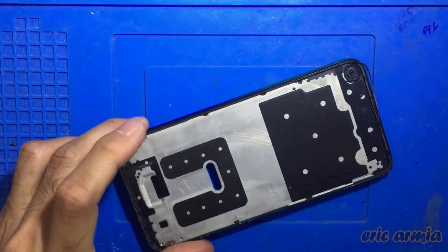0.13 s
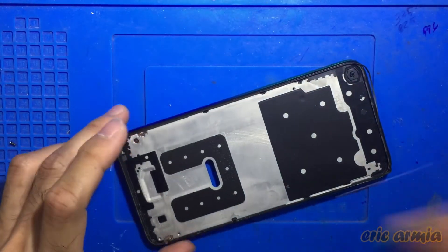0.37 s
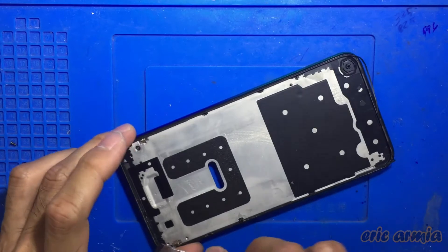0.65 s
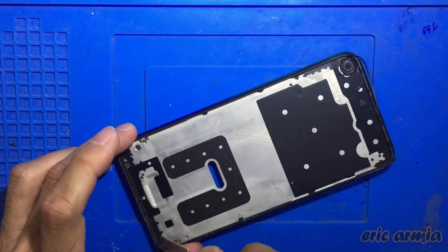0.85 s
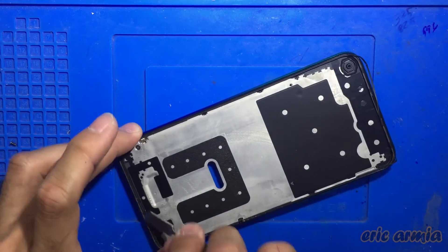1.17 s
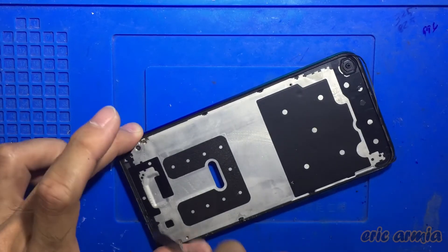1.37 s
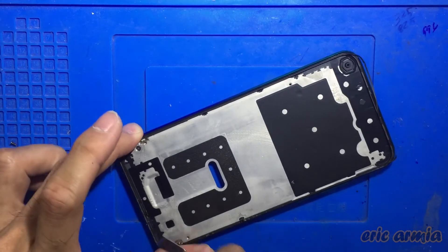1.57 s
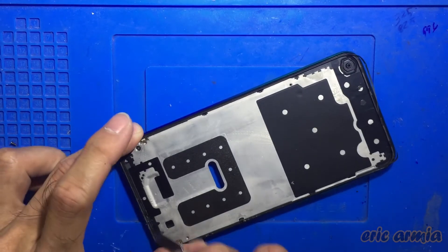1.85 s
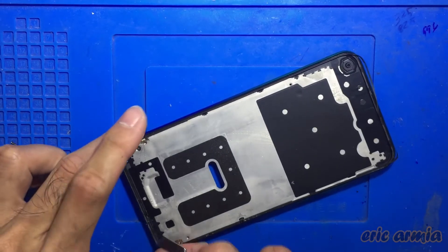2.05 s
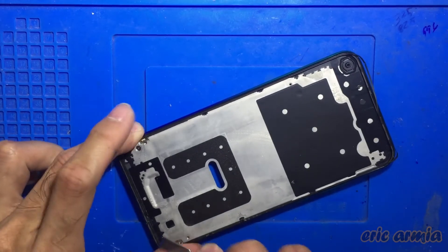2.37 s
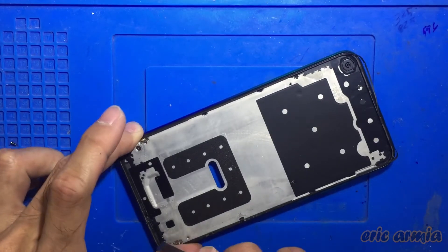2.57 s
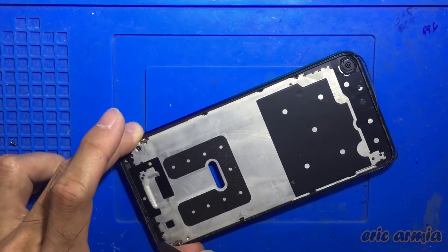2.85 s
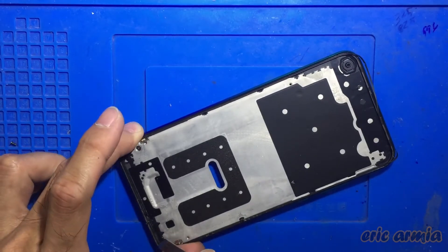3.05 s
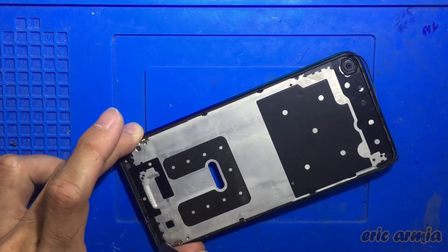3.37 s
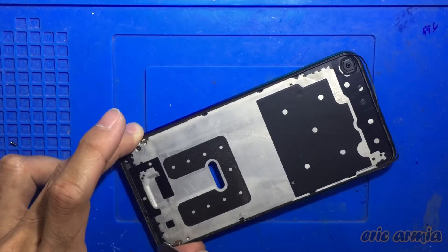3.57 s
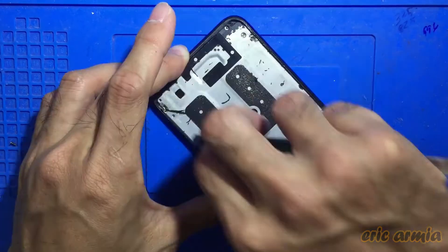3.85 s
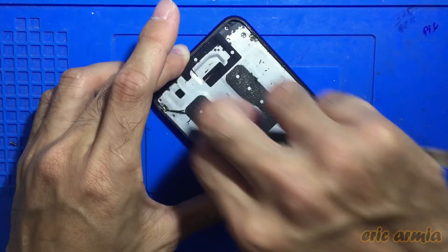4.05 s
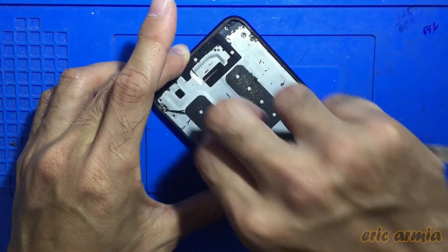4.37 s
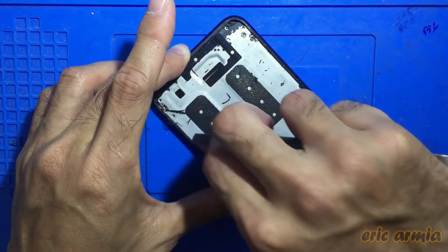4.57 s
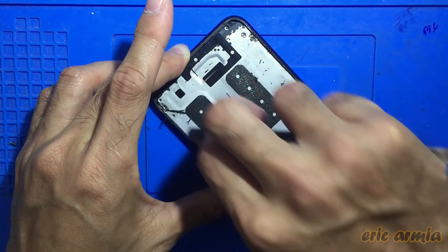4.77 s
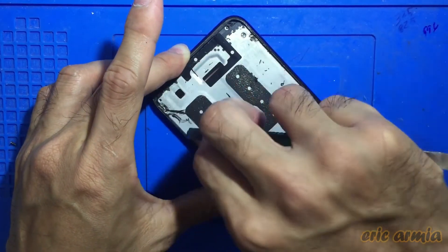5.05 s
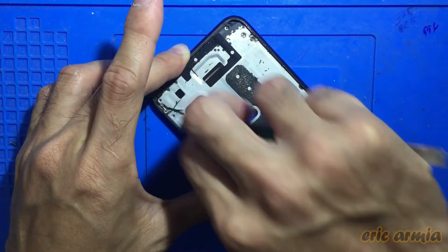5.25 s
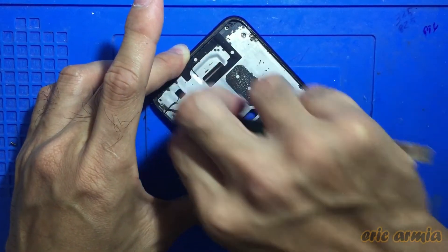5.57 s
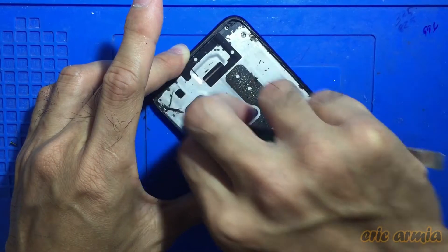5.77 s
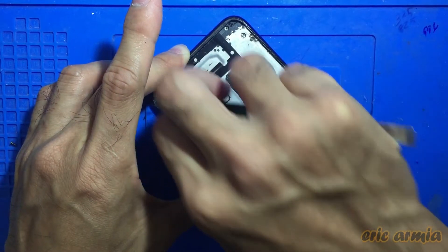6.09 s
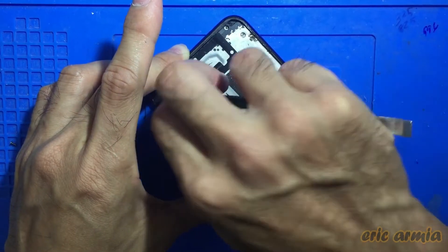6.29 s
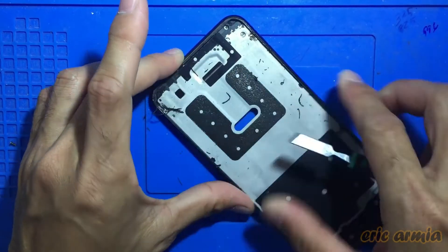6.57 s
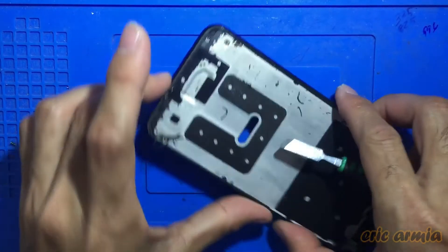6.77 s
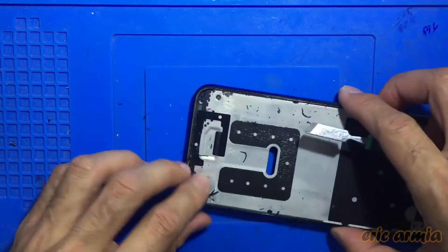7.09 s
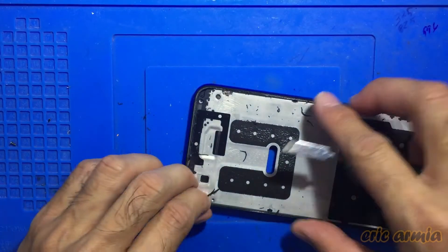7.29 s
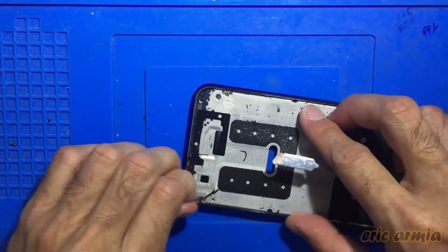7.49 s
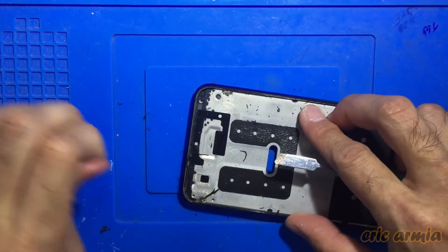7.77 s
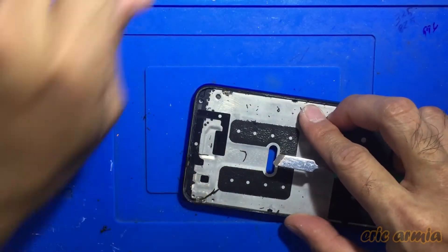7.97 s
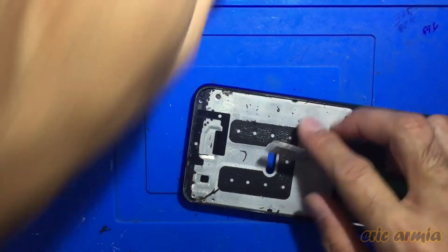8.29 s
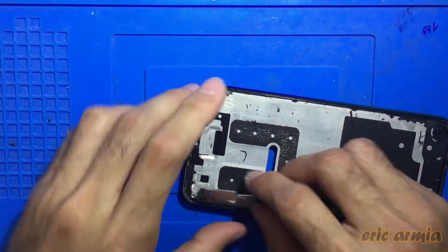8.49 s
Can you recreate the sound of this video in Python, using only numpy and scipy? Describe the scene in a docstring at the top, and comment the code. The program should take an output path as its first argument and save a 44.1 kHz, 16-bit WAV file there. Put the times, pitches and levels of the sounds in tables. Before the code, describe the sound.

A low bench-fan hum with soft dull noise runs throughout in a small, dry room, miked close. At 0 to 0.2 s a loose steel tool clatters and skids with a short bright ring; faint ticks follow at 0.4 s. From about 1.2 to 2.1 s a hand tool scrapes the rim of a metal phone frame, eight raspy strokes growing stronger. At 2.2 s it breaks free with a loud hard snap, by far the loudest event, and a rattle dying within a tenth of a second. Near silence, then at 3.3 to 3.75 s sharp picks and scratches, the first a solid knock. From 3.9 to 6.4 s the plate is scrubbed to and fro, about nine gritty metallic strokes a second, uneven, with small catches. A tick at 6.5 s, a soft thud at 6.7 s, a click with light scraping at 7.3 to 7.5 s, and a last click at 7.8 s; then only hum.

```python
"""A loose steel tool clatters first, as bursts of contact noise and free ringing tones.
Then a hand tool picks along the rim of a metal phone frame on a rubber mat: grains of noise ring the frame.
It breaks free with a loud snap and a short rattle, made of brief blows, then picks at the rim again.
Next it scrubs the flat plate to and fro, about nine strokes a second, and two clicks follow at the end.
Bench equipment hums throughout: steady tones over filtered noise. A small room answers the work."""
import sys
import numpy as np
from scipy import signal
from scipy.fft import rfft, irfft, next_fast_len
from scipy.io import wavfile
from scipy.ndimage import uniform_filter1d

SR = 44100
rng = np.random.default_rng(int(sys.argv[2]) if len(sys.argv) > 2 else 0)


def inscribe(sig):
    """Save sig as 16-bit PCM at rate SR to the path in sys.argv[1].

    A 1-D sig is mono; a 2-D sig holds one channel per row.
    Samples are clipped to [-1, 1] before scaling.
    """
    pcm = np.round(np.clip(np.atleast_2d(sig).T, -1, 1) * 32767)
    wavfile.write(sys.argv[1], SR, pcm.astype(np.int16))


N = 380583  # length in samples


def gain_of(db):
    """Turns decibels into a gain."""
    return 10 ** (np.asarray(db) / 20)


def evened(x):
    """Scales a sound to an rms of 1."""
    return x / np.sqrt(np.mean(x ** 2) + 1e-20)


def read(points, hz):
    """Joins (Hz, value) points by straight lines over log frequency."""
    f, value = np.transpose(points)
    return np.interp(np.log(hz + 1), np.log(f), value)


def add(mix, s, sound):
    """Mixes a sound in at time s, cutting off what falls outside."""
    start = round(s * SR)
    sound = sound[max(-start, 0):]
    part = mix[max(start, 0):][:len(sound)]
    part += sound[:len(part)]


def drift(per_s, size):
    """Joins random values, per_s of them each second, by straight lines."""
    at = np.arange(size) * per_s / SR
    return np.interp(at, np.arange(size // 8), rng.standard_normal(size // 8))


# Strokes to and fro. Each row: middle in seconds, level in dB before the layer's own level,
# length at half power in seconds, brightness in dB, extra low ring in dB,
# lean without unit (plus swells slowly and stops short, minus the reverse), favoured band in Hz.
STROKES = [(1.293, -43, 0.039, -2, -1, -0.0006, 9500), (1.412, -43, 0.06, -3, -11, 0.13, 8360),
           (1.537, -41, 0.042, -14, -4, 0.2, 2800), (1.652, -36.5, 0.033, 2.5, -13, 0.27, 3980),
           (1.768, -35.5, 0.044, -10, 4, 0.07, 7540), (1.881, -34, 0.038, -4, -11, 0.25, 4100),
           (2.003, -34, 0.036, -3.5, 8, -0.072, 6700), (2.113, -32, 0.032, -3, -2.5, 0.064, 8400),
           (2.348, -40.5, 0.032, 3, -5, 0, 6800), (3.921, -37.5, 0.029, 1.5, -2.5, 0.078, 7600),
           (4.053, -36.5, 0.044, -3, 6, 0.41, 7830), (4.154, -40.5, 0.032, -1, 0, 0.18, 7800),
           (4.297, -36.5, 0.044, -4.5, 5, 0.32, 7800), (4.397, -38, 0.038, -2.5, 1.5, 0.09, 7900),
           (4.54, -37.5, 0.045, -1.5, 7, 0.37, 7400), (4.632, -43, 0.041, -3, -1, -0.096, 7350),
           (4.773, -42, 0.047, -6, 7, 0.45, 5930), (4.866, -46.5, .05, -6, 6, -0.18, 8500),
           (5.013, -40, 0.058, -10, 4.5, 0.32, 5800), (5.114, -42, 0.044, -3, 4.5, 0.046, 7360),
           (5.24, -42, 0.048, -7, 3, 0.27, 5940), (5.346, -39, 0.036, -3.5, 3.5, -0.06, 7100),
           (5.481, -38, .047, -7.5, 3.5, 0.32, 9030), (5.575, -41, .046, -5.5, 1.5, -0.17, 8100),
           (5.723, -37, 0.041, -6.5, 4.5, 0.51, 2310), (5.812, -41, 0.044, -5, 0, -0.26, 3800),
           (5.947, -38, 0.041, -12, 3.5, 0.33, 8200), (6.041, -42.5, 0.049, -8, 2.5, 0.017, 8800),
           (6.167, -42.5, 0.051, -10.5, 4.5, 0.47, 7900), (6.259, -40, 0.048, -10, -0.5, -0.25, 3400),
           (6.389, -40, 0.053, -8.5, 6, 0.42, 9400)]
# Single rubs outside the rhythm. Each row: middle in seconds, level in dB before the layer's own level,
# length at half power in seconds, brightness in dB, favoured band in Hz.
RUBS = [(0.399, -46.5, 0.021, 14.5, 2000), (0.619, -59, 0.022, 14, 3030), (1.23, -38.5, 0.057, -5, 5750),
        (1.369, -48, .02, -5, 3550), (2.233, -24, 0.018, 7, 2700), (2.3, -41, .05, 7, 6400),
        (2.777, -50.5, 0.022, -4.5, 1890), (2.906, -51, 0.039, -16, 1900), (3.315, -36.5, 0.01, -9.5, 1844),
        (3.354, -34.5, 0.044, 2, 2600), (3.464, -41, 0.044, 2.5, 3600), (3.556, -36, 0.032, 2, 2400),
        (3.614, -48, 0.015, -6, 1900), (3.707, -41, 0.015, -11, 1970), (3.749, -40.5, 0.0088, 0, 1911),
        (6.509, -39, 0.016, -12.5, 1960), (6.724, -52.5, 0.039, 0, 2650), (7.385, -43, 0.015, -4, 2500),
        (7.41, -40.5, 0.039, 7.5, 3700), (7.424, -40.5, 0.019, -2, 2400), (7.455, -41, 0.012, -8, 3500),
        (7.508, -51, 0.017, 0, 3500), (7.526, -54, 0.013, -4.5, 2600)]


def all_strokes():
    """Lists all rubbing as stroke rows: a single rub is even and has no extra low ring."""
    return even_strokes(RUBS) + STROKES


def even_strokes(rubs):
    """Gives rubs the form of stroke rows, with no low ring and no lean."""
    return [(s, db, length, bright_db, 0, 0, hz) for s, db, length, bright_db, hz in rubs]


PLATE_FROM, PLATE_TO = 3.83, 7.0  # seconds between which the plate is worked


def on_plate(rows):
    """Picks the rows that fall in the time on the plate."""
    return [row for row in rows if PLATE_FROM <= row[0] < PLATE_TO]


def on_rim(rows):
    """Picks the rows outside the time on the plate."""
    return [row for row in rows if not PLATE_FROM <= row[0] < PLATE_TO]


# Resonances of the frame. Each row: pitch in Hz, width at half the lift in Hz,
# lift in dB when worked at the rim, lift in dB when worked on the plate, lift in dB when knocked.
FRAME_MODES = [(612, 27, 8, 6, 0), (843, 93, 16, 17, 13), (1020, 120, 8.5, 10.5, 6.5),
               (1325, 150, 8.5, 5.5, 6), (1524, 330, 4, 12, 1.5), (1791, 178, 17, 11, 9),
               (1886, 207, 14.5, 15, 5.5), (2046, 170, 18, 14, 4), (2424, 260, 4.5, 6.5, 5),
               (2550, 180, 4.5, 3, 5.5), (3150, 140, 7.5, 3, 8), (3351, 180, 4, 15, 4.5),
               (3603, 310, 8.5, 9.5, 2.5), (4180, 620, 3.5, 4.5, 4), (4490, 140, 1.5, 13, 6),
               (5260, 210, 2, 7, 2.5), (5750, 260, 8.5, -0.5, 6), (6300, 350, 7, 5, 10),
               (6700, 710, 8, 7.5, 2), (7677, 610, 5, -3.5, 4.5), (8284, 590, 9, 1, 2.5),
               (8793, 510, 8.5, 6, 8.5), (9530, 630, 7, 8, 3), (11200, 180, 0, 15, -1),
               (11700, 870, 6, 3, 0.5), (12300, 410, 3, 9, 1.5), (13700, 330, 2.5, 12, 2),
               (14910, 610, 7, 7, 2.5)]
# Broad colour under the resonances, for each kind of contact. Each row: pitch in Hz, relative level in dB.
RIM_COLOUR = [(40, -13), (110, -1), (220, -9.5), (300, -15.5), (720, -18), (1650, -15), (2250, -10.5),
              (2900, -16.5), (4800, -20.5), (8000, -30.5), (12000, -32), (15500, -31)]
PLATE_COLOUR = [(35, 5), (55, 17), (110, 8.5), (210, 5), (300, -8), (720, -13.5), (1650, -18.5),
                (2250, -0.5), (2900, -16), (4800, -23), (8000, -29.5), (12000, -33), (15500, -35)]
KNOCK_COLOUR = [(60, -22), (330, -18.5), (480, -19.5), (720, -19), (1650, -7.5), (2250, -1), (2900, -7),
                (4800, -11), (8000, -15), (12000, -13.5), (15500, -19)]


def frame_contacts():
    """One frame rings differently at the rim, on the plate and when knocked: (colour, modes) for each."""
    hz, width, *lifts = np.transpose(FRAME_MODES)
    colours = [RIM_COLOUR, PLATE_COLOUR, KNOCK_COLOUR]
    return [(colour, list(zip(hz, width, lift))) for colour, lift in zip(colours, lifts)]


def scrubbing(rows, contact, grains_per_s, spread_db, judder_db, smooth, level_db):
    """Each stroke swells and fades; tiny stick-slip grains bunch into a judder, as the ring changes."""
    out, t = np.zeros(N), np.arange(-SR // 10, SR // 10) / SR
    colour, modes = contact
    for s, db, length, bright_db, weight_db, lean, favoured_hz in rows:
        travel = 2 * t / max(length, .008)
        steepness = 6 * (1 + np.clip(lean, -.7, .7) * np.sign(t))
        speed = signal.windows.tukey(len(t), .5) / np.sqrt(1 + abs(travel) ** steepness)
        strength_db = spread_db * np.minimum(rng.exponential(1, len(t)), 2)
        slips = (rng.random(len(t)) < grains_per_s / SR) * gain_of(strength_db)
        grain = evened(slips * rng.choice([-1, 1], len(t)))
        grain = grain + smooth * rng.standard_normal(len(t))
        # a fast judder, and a slower lurch of 2 dB
        judder = gain_of(judder_db * np.clip(drift(170, len(t)), -2, 2) + 2 * drift(60, len(t)))
        force = gain_of(db + level_db) * evened(grain * speed * judder) * np.sqrt(np.mean(speed ** 2))
        # the ring fades over from one spot to the next along the stroke
        for nearness in np.eye(2):
            share = np.interp(travel, [-1, 1], nearness)
            spot = at_spot(modes, [favoured_hz], wander_db=1.5)
            add(out, s + t[0], ring(share * force, body(colour, spot, bright_db, weight_db)))
    return out


SCRATCH_LOW_HZ, SCRATCH_HIGH_HZ = 2700, 6600  # pitch range of single scratches and rattle blows
SCRATCH_WIDTH = 0.14  # half width of a scratch's band, as a share of its pitch
SCRATCH_S, SCRATCH_REACH = .0022, 0.66  # fading time in s, and scatter to either side in stroke lengths
SCRATCH_RANGE_DB, SCRATCH_FALL_DB = 10, 8.5  # spread of strength, and loss at the top pitch


def scratch_pitch(height):
    """Turns a height from 0 to 1 into a pitch in Hz, in even musical steps."""
    return SCRATCH_LOW_HZ * (SCRATCH_HIGH_HZ / SCRATCH_LOW_HZ) ** height


def scratches(rows, level_db, count=18):
    """The tip crosses small burrs within each stroke: brief noise bursts, each with its own pitch."""
    out, t = np.zeros(N), np.arange(-SR // 100, SR // 50) / SR
    hz = np.fft.rfftfreq(len(t), 1 / SR)
    for s, db, length, bright_db, *_ in rows:
        for where, pitch, size in rng.random((count, 3)):
            centre = scratch_pitch(pitch)
            band = 1 / (1 + ((hz - centre) / (SCRATCH_WIDTH * centre)) ** 2)
            noise = evened(irfft(band * rfft(rng.standard_normal(len(t))), len(t)))
            burst = noise * np.exp(-abs(t) / SCRATCH_S)
            # a brighter stroke makes stronger scratches
            strength_db = db + level_db + bright_db - SCRATCH_RANGE_DB * size - SCRATCH_FALL_DB * pitch
            offset_s = (2 * where - 1) * SCRATCH_REACH * length
            add(out, s + offset_s + t[0], gain_of(strength_db) * burst)
    return out


# The tip catches hard on a ridge and slips off. Each row: time in seconds,
# level in dB before the layer's own level, brightness in dB, favoured band in Hz.
CATCHES = [(0.983, -48, -21, 3500), (1.226, -41.5, -5, 5900), (1.297, -39, 0, 6500),
           (1.314, -44, 10.5, 5700), (1.405, -34, 3, 8200), (1.483, -42.5, 6.5, 5700),
           (1.511, -35.5, -8, 4100), (1.536, -42, -16, 2800), (1.555, -41, -4.5, 5900),
           (1.62, -34.5, 8.5, 4200), (1.658, -27.5, 5.5, 8200), (1.7505, -29, -0.5, 7450),
           (1.863, -39.5, 7, 5770), (1.877, -38, -6, 4100), (1.921, -57.5, 10, 4060),
           (1.984, -33, -4, 5660), (1.994, -30, -6, 6650), (2.024, -39, -6, 6700), (2.202, -22, 3.5, 6700),
           (2.222, -30, 7, 4200), (2.236, -29.5, 17, 6800), (2.334, -34.5, -8, 2996),
           (2.995, -35.5, -12, 3500), (3.3295, -17, -8, 1402), (3.351, -25.5, 9.5, 8400),
           (3.368, -22.5, -6.5, 2516), (3.39, -40, 3, 2500), (3.4585, -22, 3.5, 8050),
           (3.541, -35.5, -10, 9300), (3.552, -35, -3, 2370), (3.7505, -29, -17, 4470),
           (3.89, -35, -12.5, 2400), (3.924, -27, 1, 5200), (4.076, -38, -16, 2340),
           (4.159, -26.5, -0.5, 3360), (4.297, -28, 2, 3380), (4.321, -33, 10, 7300),
           (4.402, -22.5, 4, 3330), (4.535, -28, 15.5, 7100), (4.544, -25, 13.5, 7240),
           (4.554, -32, 20.5, 7240), (4.613, -33, -8, 3400), (4.787, -35.5, -12.5, 5800),
           (4.848, -34, -4, 8500), (4.885, -40, -6, 3400), (5.017, -32, -21, 2410), (5.033, -27.5, 4, 9600),
           (5.0995, -23.5, -9.5, 2380), (5.354, -35.5, -10, 2400), (5.562, -25.5, -6, 3510),
           (5.738, -36.5, 1.5, 2330), (5.812, -32.5, -8, 3820), (6.03, -31, -16, 2400),
           (6.493, -43.5, -1, 3400), (6.507, -33, 10, 8900), (6.512, -45, 3, 3400)]


def catches(rim, plate):
    """The tip grips a ridge and slips off: short blows; weaker catches ring the resonances less."""
    out = blows(on_rim(CATCHES), rim, rise_s=0.0011, chatter_s=0.0014, level_db=-3.0,
                lag_s=0.00098, freedom_per_db=0.03)
    out += blows(on_plate(CATCHES), plate, rise_s=0.00095, chatter_s=0.0021, level_db=-6.5,
                 lag_s=0.000975, freedom_per_db=0.04)
    return out


# Hard knocks on the frame, with the snap and the end clicks. Each row: time in seconds,
# level in dB before the layer's own level, brightness in dB, favoured band in Hz.
KNOCKS = [(0.397, -51.5, 1, 4030), (0.408, -50.5, 6, 3760), (0.419, -57, 6, 3420), (2.245, -10, -2, 1300),
          (2.2595, -24, -3.5, 2915), (6.733, -54, -8.5, 6156), (7.332, -44.5, -3, 1900),
          (7.3348, -35.5, 8, 2450), (7.3375, -44.5, 6, 3480), (7.3415, -45, 6, 4500),
          (7.346, -40, 7.5, 3900), (7.8275, -38.5, 2, 3820), (7.832, -53.5, 1, 2100)]


def knocks(contact):
    """Hard contacts start abruptly and ring the whole frame."""
    return blows(KNOCKS, contact, rise_s=0.0002, chatter_s=0.0028, level_db=-0.5, lag_s=0.00042)


RATTLE_FROM, RATTLE_S = 2.252, .11  # start and length in seconds
RATTLE_DB, RATTLE_FADE_DB_PER_S = -30, 261  # first level before the layer's own level, and its fall
RATTLE_RANGE_DB, RATTLE_BRIGHT_DB = 8.5, -4.5  # spread of strength, and brightness


def rattle(contact, count=24):
    """After the snap the frame rattles ever more weakly: a run of unevenly spaced blows."""
    when, weakness, height = rng.random((count, 3)).T
    after_s = (np.arange(count) + when) / count * RATTLE_S
    level_db = RATTLE_DB - RATTLE_FADE_DB_PER_S * after_s - RATTLE_RANGE_DB * weakness
    rows = [(RATTLE_FROM + s, db, RATTLE_BRIGHT_DB, hz)
            for s, db, hz in zip(after_s, level_db, scratch_pitch(height))]
    return blows(rows, contact, rise_s=0.00066, chatter_s=0.0014, level_db=-2, wander_db=2.5)


FULL_RING_DB = -38  # row level from which a catch rings the resonances in full


def blows(rows, contact, rise_s, chatter_s, level_db, lag_s=.001, wander_db=0.6, freedom_per_db=0):
    """Each blow is a burst of chatter at the contact: it builds up fast and dies within milliseconds."""
    out, t = np.zeros(N), np.arange(-SR // 100, SR // 40) / SR
    too_brief_for_bass = signal.butter(2, 190, "high", fs=SR, output="sos")
    colour, modes = contact
    for s, db, bright_db, *favoured_hz in rows:
        envelope = np.exp(-np.maximum(t / chatter_s, -t / rise_s))
        force = rng.choice([-1, 1], len(t)) * envelope
        force = signal.sosfilt(too_brief_for_bass, whitened(force))
        force *= np.sqrt(SR / 100 / np.sum(force ** 2))  # the energy of 10 ms at rms 1
        freedom = np.clip(1 + freedom_per_db * (db - FULL_RING_DB), 0, 1)
        free_modes = [(hz, width, lift * freedom) for hz, width, lift in modes]
        spot = at_spot(free_modes, favoured_hz, wander_db)
        add(out, s + lag_s + t[0], ring(gain_of(db + level_db) * force, body(colour, spot, bright_db)))
    return out


def whitened(force, size=17):
    """Evens out the broad spectrum of a short force, so that the struck body alone sets the colour."""
    z = rfft(force)
    power = uniform_filter1d(abs(z) ** 2, size)
    return irfft(z / np.sqrt(abs(power) + 1e-12), len(force))


RIPPLE_LOW_HZ, RIPPLE_HIGH_HZ = 2284, 13130  # range of the random narrow peaks and dips
RIPPLE_WIDTH_HZ, RIPPLE_DB = 190, 7  # their width, and their lift or dip
FAVOUR_DB, FAVOUR_WIDTH = 5.5, 0.15  # lift of the favoured band, and its width as a share of its pitch


def at_spot(modes, favoured_hz, wander_db, detune=0.0098, count=14):
    """Each spot shifts the modes and may favour a band; random narrow peaks and dips roughen the treble."""
    chance = rng.standard_normal((len(modes), 2))
    shifted = [(hz * (1 + detune * a), width, lift + wander_db * b)
               for (hz, width, lift), (a, b) in zip(modes, chance)]
    ripple_hz = RIPPLE_LOW_HZ * (RIPPLE_HIGH_HZ / RIPPLE_LOW_HZ) ** rng.random(count)
    # peaks and dips take turns
    ripples = [(hz, RIPPLE_WIDTH_HZ, RIPPLE_DB * (-1) ** k) for k, hz in enumerate(ripple_hz)]
    return shifted + ripples + [(hz, hz * FAVOUR_WIDTH, FAVOUR_DB) for hz in favoured_hz]


def body(colour, modes, bright_db=0, weight_db=0, size=2048):
    """A broad colour lifted by resonances, as a causal impulse response."""
    hz = np.fft.rfftfreq(size, 1 / SR)
    db = read(colour, hz)
    db = db + sum(lift * 2 ** -(2 * (hz - f) / width) ** 2 for f, width, lift in modes)
    # brightness acts on the treble, weight on the low ring
    db = db + bright_db * read([(2200, 0.043), (3500, 0.7), (6000, 0.93), (14000, 1.15)], hz)
    db = db + weight_db * read([(200, .3), (700, 1.0), (1450, 0.92), (1800, 0.003)], hz)
    # folding the cepstrum forward gives minimum phase: nothing sounds before the tap
    cepstrum = irfft(np.log(gain_of(db)))
    cepstrum[1:size // 2] *= 2
    cepstrum[size // 2 + 1:] = 0
    return irfft(np.exp(rfft(cepstrum)))


def ring(force, response):
    """A force rings a body; the band from 1500 to 3000 Hz is scaled to keep the energy of the force."""
    size = next_fast_len(len(force) + len(response), True)
    hz = np.fft.rfftfreq(size, 1 / SR)
    z = rfft(force, size) * rfft(response, size)
    main = (hz > 1500) & (hz < 3000)
    main_energy = 2 * np.sum(abs(z[main]) ** 2)
    return irfft(z, size) * np.sqrt(np.sum(force ** 2) * size / main_energy)


# The frame is pushed into the mat. Each row: time in seconds, level in dB before the mode levels.
THUDS = [(0.406, -47.5), (2.249, -25.5), (3.332, -34), (6.72, -39), (7.335, -36.5)]
# The frame rocking on the rubber. Each row: pitch in Hz, relative level in dB, time to fall 60 dB in seconds.
MAT_MODES = [(76, -4, 0.21), (131, 1, 0.017), (187, -3, 0.066), (262, -11, 0.048), (307, -11, 0.038)]


def thuds():
    """The frame bounces on the rubber: a few damped low tones."""
    out, t = np.zeros(N), np.arange(SR // 6) / SR
    swing = sum(gain_of(db - 60 * t / t60) * np.sin(2 * np.pi * hz * t) for hz, db, t60 in MAT_MODES)
    for s, db in THUDS:
        add(out, s, gain_of(db) * swing)
    return out


# The loose steel tool drops and bounces. Each row: time in seconds, level in dB before the layer's
# own level, brightness in dB, level of the free ring in dB before the mode shares.
CLATTER = [(0.001, -43, 27.5, -29), (0.012, -47.5, 13, -53), (0.03, -48.5, 20, -40), (0.061, -56, -4, -62),
           (0.085, -45, -5, -62), (0.097, -37, 2, -55), (0.102, -33.5, 2, -50), (0.127, -46, -1, -54),
           (0.134, -42.5, 1.5, -57), (0.159, -45, 3, -66)]
# The tool skids during and after the bounces. Each row: middle in seconds,
# level in dB before the layer's own level, length at half power in seconds, brightness in dB,
# favoured band in Hz.
SKIDS = [(0.03, -44.5, 0.08, -6, 9200), (0.112, -39, .02, -4.5, 1090), (0.155, -46.5, 0.056, -5, 3180),
         (0.205, -53, 0.043, -5.5, 2320)]
# Resonances of the tool. Each row: pitch in Hz, width at half the lift in Hz, lift in dB,
# share of the free ring in dB.
STEEL_MODES = [(583, 20, 12.5, -17.5), (1370, 96, 9, -13.5), (1770, 200, 3.5, -26), (2140, 114, 6, -29.5),
               (2570, 190, 3, -14), (3120, 690, 3, -35.5), (5140, 180, 6.5, -0.5), (8700, 440, 4.5, -1.5),
               (11480, 600, 5.5, 2), (13100, 300, 10, -3.5), (13800, 250, 4.5, -2.5), (15370, 450, 4, -6)]
# Broad colour of the tool. Each row: pitch in Hz, relative level in dB.
STEEL_COLOUR = [(80, -9.5), (350, -0.5), (750, -8), (1200, 3.5), (2800, 0.5), (4300, -6.5), (7000, -10),
                (10000, -14), (15500, -21.5)]
STEEL_T60_S, STEEL_WANDER_DB = 0.13, 2.5  # free ring: time to fall 60 dB, spread of each mode per bounce


def steel_tool():
    """The steel tool bounces, rings freely as fading tones after each bounce, and skids."""
    contact = STEEL_COLOUR, [mode[:3] for mode in STEEL_MODES]
    out = blows([row[:3] for row in CLATTER], contact, rise_s=0.00037, chatter_s=0.0043,
                level_db=2.0, lag_s=0.00028, wander_db=1.5)
    out += scrubbing(even_strokes(SKIDS), contact, grains_per_s=500, spread_db=3.5,
                     judder_db=4.0, smooth=0.306, level_db=-1.0)
    t = np.arange(SR // 3) / SR
    for s, _, _, ring_db in CLATTER:
        partials = np.zeros(len(t))
        for hz, _, _, share_db in STEEL_MODES:
            gain = gain_of(share_db + STEEL_WANDER_DB * rng.standard_normal())
            partials += gain * np.sin(2 * np.pi * (hz * t + rng.random()))
        add(out, s, partials * gain_of(ring_db - 60 * t / STEEL_T60_S))
    return out


# First echoes off the bench and the stand above it. Each row: delay in seconds, gain without unit.
ECHOES = [(.0031, .16), (.0053, -0.064), (.0079, .11), (0.0116, .09)]


def echoes(x):
    """Nearby surfaces return a few delayed copies, added to the sound itself."""
    out = x.copy()
    for delay_s, gain in ECHOES:
        add(out, delay_s, gain * x)
    return out


# How long the room rings. Each row: pitch in Hz, time to fall 60 dB in seconds.
ROOM_T60 = [(100, 0.5), (500, 0.22), (2000, 0.15), (6000, 0.18), (15000, 0.068)]
# What the room sends back. Each row: pitch in Hz, level in dB.
ROOM_COLOUR = [(100, -11), (400, -5.5), (1000, -10.5), (1900, -20), (2600, -12), (3300, -12.5),
               (4500, -16.5), (8000, -13), (15000, -12)]


def room(x, gap_s):
    """A small room: dense reflections as noise, each band dying at its own speed."""
    hz, t, z = signal.stft(rng.standard_normal(SR // 2), SR, nperseg=256)
    fading = z * gain_of(-60 * t / read(ROOM_T60, hz)[:, None])
    tail = signal.istft(fading, SR, nperseg=256)[1]
    # the reflections set in between half the gap and one and a half gaps
    tail *= np.clip(np.arange(len(tail)) / SR / gap_s - .5, 0, 1)
    response = signal.fftconvolve(tail / np.linalg.norm(tail), body(ROOM_COLOUR, []))
    return signal.fftconvolve(x, response)[:N]


# Hum tones of the bench equipment. Each row: pitch in Hz, rms level in dB before its slight wavering.
HUM = [(57.8, -48), (115.6, -51.5), (209.4, -66), (864.5, -67.5)]
# Resonances of the fan housing. Each row: pitch in Hz, width at half the lift in Hz, lift in dB.
FAN_MODES = [(235, 90, 7), (533.7, 45, 10), (583.8, 50, 12), (665, 53, 7), (838, 22, 4), (885, 94, 11),
             (968, 39, 10), (1001.4, 22, 10.98), (1150, 45, 3.6), (1390, 55, 7), (1625, 150, 8),
             (1950, 41, 4)]
# Broad colour of the background noise as heard, with a dull top. Each row: pitch in Hz, relative level in dB.
NOISE_COLOUR = [(25, -42.5), (45, -13), (65, -8), (95, 4), (130, -3), (165, -10), (250, -15), (400, -23),
                (750, -26.5), (1150, -31), (2000, -32.5), (4000, -39.5), (12500, -52), (15000, -66.5)]
NOISE_DB = -50.5  # rms level of the background noise


def bench():
    """A fan: hum tones that waver in level and phase, over steady noise with the housing's resonances."""
    colouring = body(NOISE_COLOUR, FAN_MODES, size=8192)
    white = rng.standard_normal(N + len(colouring) - 1)
    noise = evened(signal.fftconvolve(white, colouring, "valid"))
    t, hum = np.arange(N) / SR, np.zeros(N)
    for hz, db in HUM:
        phase = 2 * np.pi * (hz * t + rng.random()) + .12 * drift(4.7, N)
        hum += gain_of(db + 0.42 * drift(4.2, N)) * np.sin(phase)
    return gain_of(NOISE_DB) * noise + np.sqrt(2) * hum  # root 2 makes the hum levels rms levels


def scene():
    """Work at the rim and on the plate, knocks and clatter, the room and the bench, alike on both sides."""
    rim, plate, knock = frame_contacts()
    passes = all_strokes()
    work = scrubbing(on_rim(passes), rim, grains_per_s=960, spread_db=4, judder_db=4.5,
                     smooth=0.3, level_db=-2.5)
    work += scrubbing(on_plate(passes), plate, grains_per_s=1300, spread_db=5.0, judder_db=2.5,
                      smooth=0.49, level_db=-1.33)
    work += scratches(on_rim(STROKES), level_db=-11.0)
    work += scratches(on_plate(passes), level_db=-10.5)
    work += catches(rim, plate)
    work += knocks(knock) + rattle(knock)
    work += thuds() + steel_tool()
    mono = echoes(work) + room(work, gap_s=0.0082) + bench()
    return np.array([mono, mono])


EDGE_HZ = 16050  # upper band limit


def record(dry, low_cut_hz=35):
    """The microphone sheds the lowest bass, the input clips what is too loud, then the top is cut off."""
    low_cut = signal.butter(8, low_cut_hz, "high", fs=SR, output="sos")
    picked_up = signal.sosfilt(low_cut, dry)
    clipped = np.clip(picked_up, -.88, .88)
    band_limit = signal.firwin(401, EDGE_HZ, window=("kaiser", 8), fs=SR)
    return signal.oaconvolve(clipped, band_limit[None], "same")


dry = scene()
out = record(dry)
inscribe(out)
```